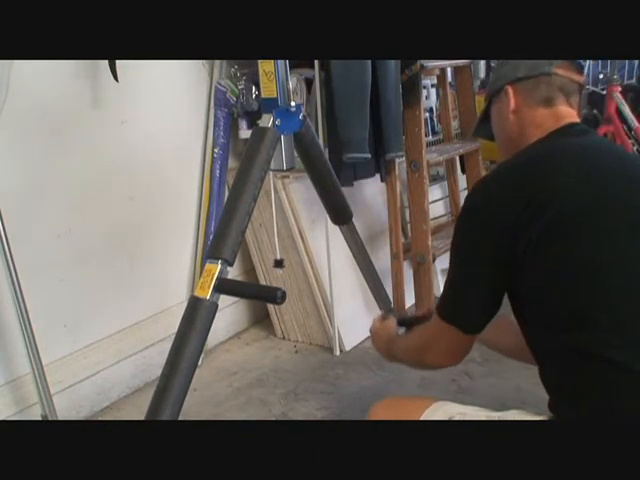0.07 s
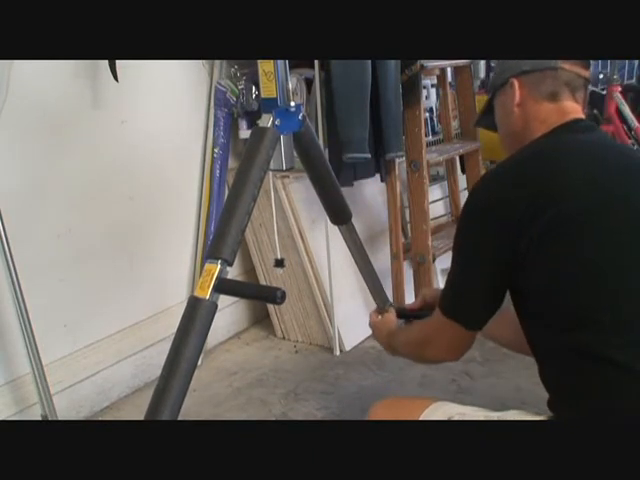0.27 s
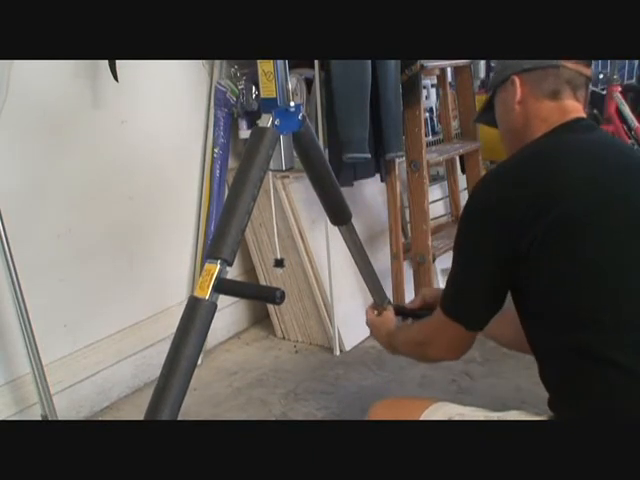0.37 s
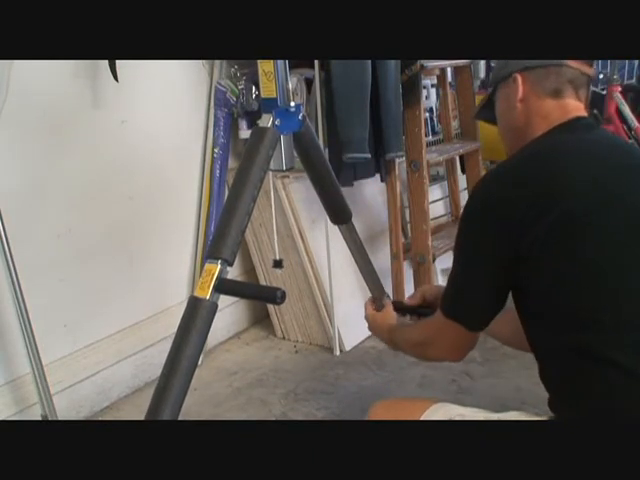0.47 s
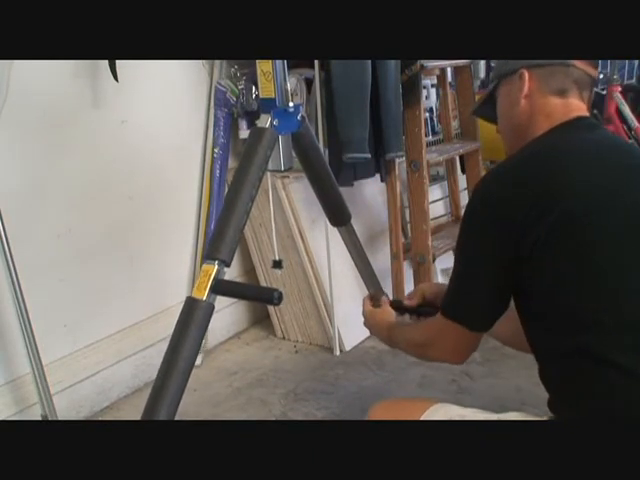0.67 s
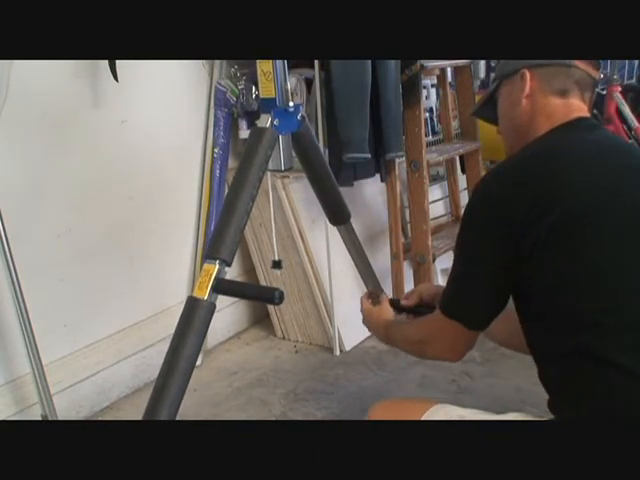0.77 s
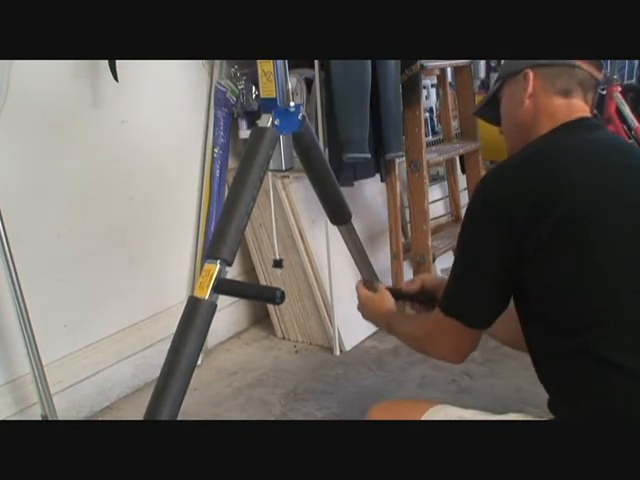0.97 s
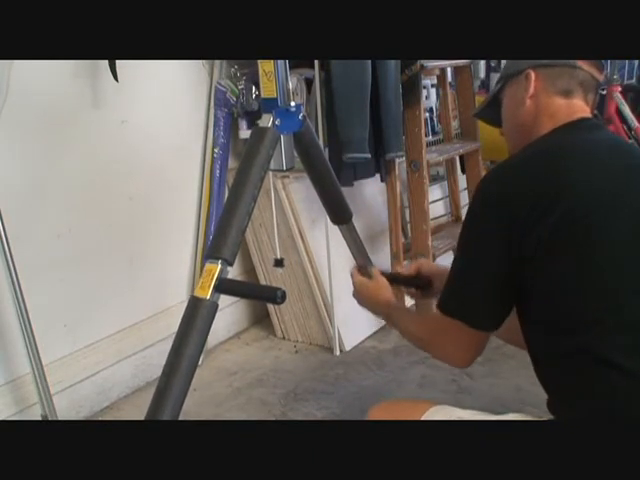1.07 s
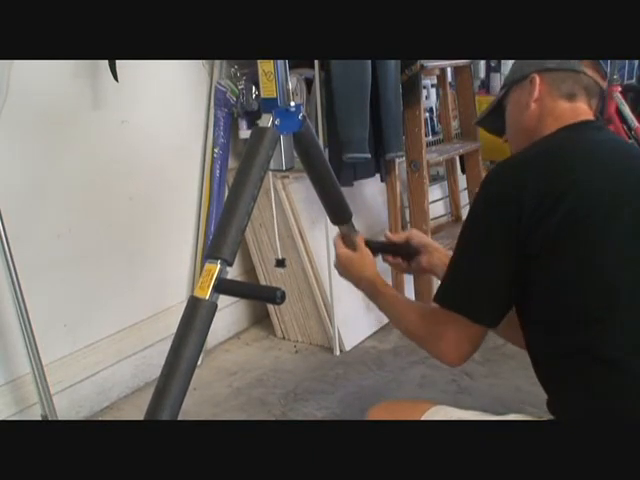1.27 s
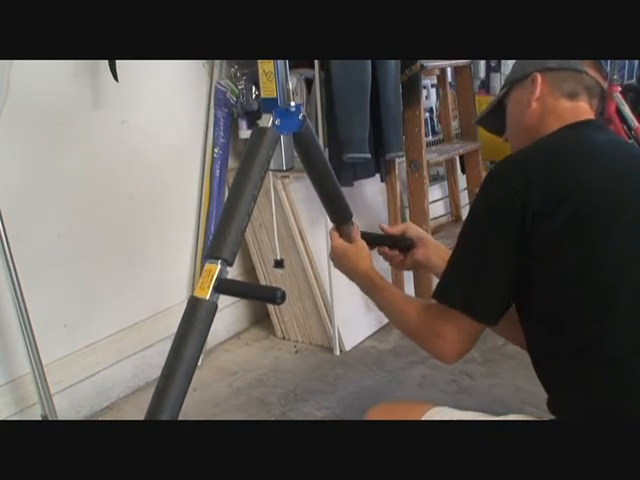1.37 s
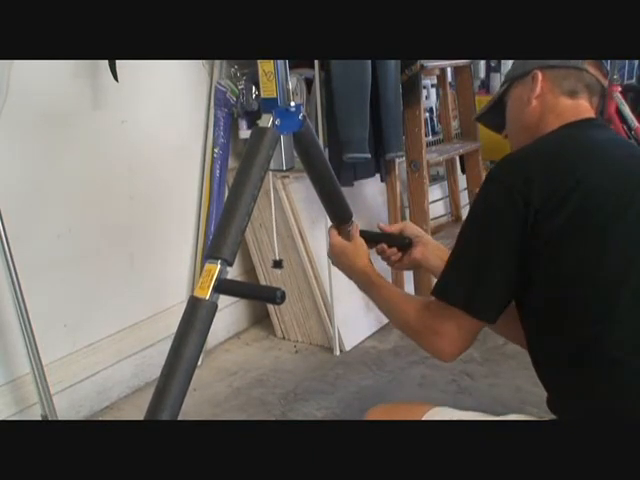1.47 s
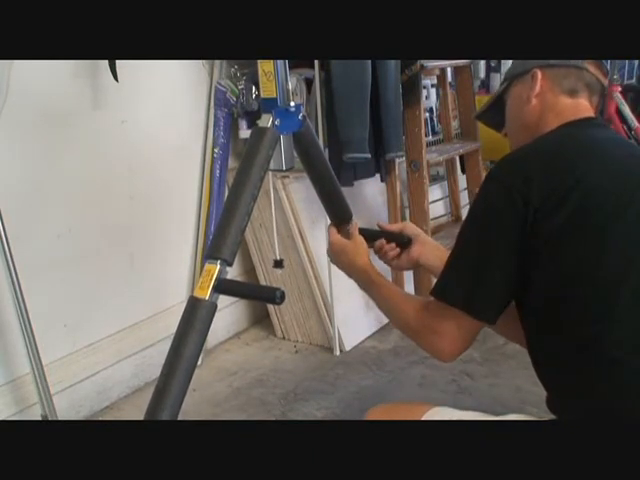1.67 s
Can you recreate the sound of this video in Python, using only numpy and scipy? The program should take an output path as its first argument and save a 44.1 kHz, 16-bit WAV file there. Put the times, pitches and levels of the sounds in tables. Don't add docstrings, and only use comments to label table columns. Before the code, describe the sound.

A padded peg's steel collar knocks a hollow tube end, then the leg, stutters dully as it is pushed on, and scrapes upward with ringing catches; close microphone in a bare, lively garage.

```python
import sys
import numpy as np
from scipy import signal
from scipy.fft import rfft, irfft, next_fast_len
from scipy.io import wavfile
from scipy.ndimage import uniform_filter1d, map_coordinates

SR = 44100
rng = np.random.default_rng(int(sys.argv[2]) if len(sys.argv) > 2 else 0)


def linear_from_db(decibels):
    return 10 ** (np.asarray(decibels, float) / 20)


def log_audio(samples):
    frames = np.atleast_2d(samples).T
    limited = np.clip(frames, -1, 1)
    pcm = np.round(limited * 32767).astype(np.int16)
    wavfile.write(sys.argv[1], SR, pcm)


N = 74970

# frequency in Hz, level in dB.
AIR_COLOUR = [(15, -63), (25, -32), (45, -14), (74, -10.5), (108, -12.5), (166, -9), (223, -23.5),
              (700, -27), (2910, -33.5), (9820, -46), (16000, -40)]
# frequency in Hz, rms level in dB.
MOTOR_LINES = [(57, -65), (86, -63.5)]
# frequency in Hz, level in dB.
TREMBLE_COLOUR = [(15, -52), (25, -26), (40, -15), (70, -5), (114, -22), (200, -7.5), (260, -3),
                  (440, -120)]
# time in seconds, trembling level in dB.
GRIP = [(.2, -77), (.24, -49.5), (.45, -60.5), (.56, -44.5), (.68, -43.5), (.76, -65.5), (1.1, -51),
        (1.7, -59.5)]
# frequency in Hz, time to fall 60 dB in seconds.
ROOM_DECAY = [(100, 0.96), (400, 0.71), (1500, 0.45), (5000, 0.55), (12000, 0.41)]
# start in seconds, frequency in Hz, level in dB,
# time to fall 60 dB in seconds.
LEG_TONES = [(.215, 363, -34.5, 0.42), (.215, 550, -36, 0.35), (.505, 435.9, -27.5, 0.49),
             (.52, 292, -37.5, 0.71), (.55, 190, -39.5, 0.53), (.505, 580, -40.5, 0.79),
             (.8, 203.6, -41, 0.84), (.8, 268.4, -42.5, 0.71), (.8, 560, -34.5, 0.23),
             (1.09, 382.6, -40.5, 0.77), (1.2, 332, -35.5, 0.23), (1.2, 211, -36.5, 0.22),
             (1.43, 334, -37.5, 0.44), (1.102, 970, -30.5, 0.092), (1.36, 3950, -43, 0.18),
             (1.412, 3960, -40, 0.1), (1.6, 2884, -61.5, 1.8), (.642, 3230, -40.5, 0.33),
             (.232, 4870, -32, 0.42), (1.08, 540, -37.5, 0.35)]

# time in seconds, rubbing level in dB, brightness in dB.
STROKE = [(0.299, -42, -36), (0.381, -37.5, 3), (.46, -35.5, 3), (.62, -39, 4.5), (.75, -53.5, 4),
          (0.802, -40, 12), (.86, -61, -3), (0.923, -60, -24), (0.959, -35, 4.5), (1.06, -34.5, 0),
          (1.107, -33, 5.5), (1.19, -38, 9), (1.27, -32, 3.5), (1.36, -35, 4), (1.45, -33, -2),
          (1.559, -48.5, -9), (1.629, -58, -2.5)]
# start in seconds, end in seconds.
CLIMB = [
    (.78, 0.816),
    (1.05, 1.143),
    (1.38, 1.425),
]
# frequency in Hz, level in dB.
RUB_COLOUR = [(60, -72), (110, -17.5), (370, 0), (680, -7), (1100, -0.5), (2200, -9), (2850, -16),
              (4400, -13.5), (6000, -14.5), (16000, -24)]
# frequency in Hz, width in Hz, level in dB.
TIP_RING = [(1010, 110, 3), (1430, 33, -5), (1810, 175, 4), (3295, 88, 0.5), (3880, 160, -9),
            (5070, 60, -3.5), (5800, 100, -11), (7300, 35, -17), (7550, 71, -15)]
LOW_RING = [(1946, 27, 1.5), (2280, 37, -18), (3370, 84, -9), (3920, 44, -5), (4870, 97, -3.5),
            (5320, 38, -2), (5700, 29, -11), (5870, 35, -4), (6700, 45, -6), (7270, 80, -23)]
HIGH_RING = [(836, 18, 2.5), (1113, 120, 4), (1230, 41, -9), (1710, 150, -4.5), (3173, 33, -5),
             (3410, 41, -3), (3983, 35, -6), (5050, 160, -8), (5630, 50, -8), (6130, 120, -11),
             (7100, 40, -16), (7600, 50, -13), (2210, 61, -20)]
TOP_RING = [(326, 260, -8.5), (1070, 160, -4), (1740, 105, -6.5), (2240, 49, -4.5), (2800, 140, -10),
            (3200, 37, -1.5), (3480, 35, -2), (3970, 130, -10), (4950, 120, -5.5), (5560, 110, -9),
            (6210, 36, -7), (7440, 43, -23)]

# start in seconds, peak in dB, contact in seconds.
NUDGES = [
    (1.262, -29, 0.0068),
    (1.366, -27, 0.0063),
    (1.437, -30, 0.0043),
]
# start in seconds, peak in dB, contact in seconds,
# sizzle in dB.
SHOVES = [
    (0.779, -27.5, 0.0029, -20),
    (0.789, -27.5, 0.003, -10),
    (0.801, -25.5, 0.0011, 3),
    (0.806, -21.5, 0.0037, 7),
    (0.811, -24, 0.0026, 9.5),
]
# start in seconds, peak in dB, contact in seconds.
SEATS = [
    (.2125, -13, 0.0045),
    (.219, -18, 0.0098),
    (0.4999, -15.5, 0.0046),
    (.507, -16, 0.0034),
    (.515, -19, 0.0034),
]
# start in seconds, peak in dB, contact in seconds, tone in Hz, sizzle in dB.
CATCHES = [(.639, -23, 0.0069, 3230, -24), (.936, -22.5, 0.0032, 1900, 9.5),
           (0.939, -16.5, 0.0022, 3260, 13), (1.014, -22, 0.0063, 2330, -22),
           (1.017, -16.5, 0.006, 3390, 0.5), (1.078, -18.5, 0.0033, 2730, -8),
           (1.085, -26.5, 0.0077, 3480, 0), (1.179, -23.5, 0.0031, 1560, -22),
           (1.207, -17.5, 0.0052, 1900, -14), (1.21, -26.5, 0.0044, 3500, -5)]
# frequency in Hz, level in dB.
END_COLOUR = [(88, -41), (250, -15.5), (400, -4), (700, -20), (1080, -9), (2300, -17), (3400, -12),
              (3900, -26), (5000, -17), (8800, -40), (16000, -30)]
LEG_COLOUR = [(88, -44), (200, -11.5), (430, -5.5), (700, -10), (1300, -5.5), (2600, -18), (4580, -22),
              (5800, -17), (16000, -33.5)]
SHOVE_COLOUR = [(88, -41), (150, -16), (197, -1), (730, -0.5), (1830, -11), (3480, -9.5), (3770, -27),
                (5250, -17), (16000, -28.5)]
CATCH_COLOUR = [(88, -53.5), (150, -19.5), (2310, -1), (2810, -4.5), (3350, -6), (3690, -6.5), (12400, -23),
                (15100, -54), (16000, -76)]
# frequency in Hz, width in Hz, level in dB.
END_RING = [(998, 135, 2.5), (1900, 75, 3.5), (2260, 65, 3.5), (3340, 59, -10), (3400, 22, -7),
            (4857, 25, 0.5), (5230, 230, -9.5), (5560, 25, -6), (5930, 51, -19), (7590, 200, -13),
            (9660, 170, -21), (12200, 500, -22)]
LEG_RING = [(840, 29, -1.5), (1145, 44, 0), (1290, 23, -2), (1415, 41, 3), (1930, 19, -2), (2220, 33, -4.5),
            (5400, 26, -6), (6190, 40, -7), (5730, 220, -9.5), (7460, 18, -9)]
SHOVE_RING = [(1150, 140, 3.5), (1860, 150, 5.5), (3370, 29, 5), (4240, 39, 1), (5440, 100, -1.5),
              (7600, 33, -7), (8740, 96, -12)]
CATCH_RING = [(2330, 17, 3.5), (3290, 42, 5), (5180, 19, 3.5), (6070, 87, 1), (7060, 310, -10.5),
              (7940, 170, -10), (8700, 40, -6.5)]

# frequency in Hz, side over mid in dB.
WIDTH = [(60, -18), (300, -15.5), (1000, -9.5), (5000, -8.5), (9000, -6), (10800, -0.5), (11500, -20)]
# frequency in Hz, left over right in dB.
LEAN = [(60, -3), (300, -2), (700, -2.5), (1500, 0.5), (10000, -0.5), (12000, 0)]

SEAT_RING_DB, SHOVE_RING_DB, CATCH_RING_DB, RUB_RING_DB = -1.5, 2.0, 1.5, 2
SEAT_WET_DB, SHOVE_WET_DB, CATCH_WET_DB, RUB_WET_DB = 0, 1.5, -3.5, 2
ROOM_GAP_S = .004
RISE_S, SIZZLE_RISE_S, SIZZLE_HZ = 0.00069, .004, 4500
DAMPED = 2.2
TONE_DB, TONE_Q = 15, 22


def unit(x):
    return x / np.sqrt(np.mean(x ** 2) + 1e-20)


def along(points, hz):
    f, v = np.transpose(points)
    return np.interp(np.log(hz + 1), np.log(f + 1), v)


def filtered(x, response):
    m = 2 * next_fast_len(x.shape[-1] // 2 + SR // 4)
    spectrum = rfft(x, m) * response(np.fft.rfftfreq(m, 1 / SR))
    return irfft(spectrum, m)[..., :x.shape[-1]]


def causal(db):
    cepstrum = irfft(np.log(np.maximum(linear_from_db(db), 1e-6)))
    cepstrum[1:len(db) - 1] *= 2
    cepstrum[len(db):] = 0
    return np.exp(rfft(cepstrum))


def steel(force, colour, modes, ring_db):
    def response(f):
        peaks = 0
        for hz, width, db in modes:
            power = linear_from_db(2 * (ring_db + db - along(colour, hz)))
            peaks = peaks + power * (f * width) ** 2 / ((hz * hz - f * f) ** 2 + (f * width) ** 2)
        gain_db = along(colour, f) + 10 * np.log10(1 + peaks)
        return causal(gain_db) / np.sqrt(np.mean(linear_from_db(2 * gain_db)))
    return filtered(force, response)


def garage(x):
    hz, t, z = signal.stft(rng.standard_normal((2, SR * 3 // 5)), SR, nperseg=256)
    decay = linear_from_db(-60 * t / along(ROOM_DECAY, hz)[:, None])
    tail = signal.istft(z * decay, SR, nperseg=256)[1]
    tail = tail / np.linalg.norm(tail[0])
    tail = np.pad(tail, ((0, 0), (int(ROOM_GAP_S * SR), 0)))
    return signal.fftconvolve(x[None], tail, axes=1)[:, :len(x)]


def garage_air():
    air = filtered(rng.standard_normal((2, N)), lambda f: linear_from_db(along(AIR_COLOUR, f)))
    return linear_from_db(-58) * unit(air)


def motor():
    t = np.arange(N) / SR
    return sum(linear_from_db(db + 3.5) * np.sin(2 * np.pi * hz * t) for hz, db in MOTOR_LINES)


def trembling():
    s, db = np.transpose(GRIP)
    level = linear_from_db(np.interp(np.arange(N) / SR, s, db, left=-120))
    shake = filtered(rng.standard_normal((2, N)), lambda f: linear_from_db(along(TREMBLE_COLOUR, f)))
    return level * unit(shake)


def legs():
    out = np.zeros((2, N))
    for s, hz, db, t60 in LEG_TONES:
        t = np.maximum(np.arange(N) / SR - s, 0)
        wander = [map_coordinates(k, [t * 25]) for k in rng.standard_normal((2, 60))]
        drift = 0.79 * np.array(wander)
        swell = 1 - np.exp(-t / 0.0067)
        out += linear_from_db(db - 60 * t / t60) * swell * np.sin(2 * np.pi * hz * t + drift)
    return out


def scrape():
    s, db, bright_db = np.transpose(STROKE)
    t = np.arange(N) / SR
    clumps = linear_from_db(2.2 * map_coordinates(rng.standard_normal(100), [t * 45]))
    grains = rng.random(N) < 4000 / SR
    grain_db = np.minimum(4.3 * rng.exponential(size=N), 11)
    grit = grains * linear_from_db(grain_db) * rng.choice([-1, 1], N)
    hiss = 0.88 * rng.standard_normal(N)
    force = clumps * (unit(grit) + hiss)

    on, up, top = (np.interp(t, span, [0, 1]) for span in CLIMB)
    places = [(1 - on, TIP_RING), (on * (1 - up), LOW_RING), (up * (1 - top), HIGH_RING), (top, TOP_RING)]
    x = unit(sum(steel(np.sqrt(share) * force, RUB_COLOUR, ring, RUB_RING_DB) for share, ring in places))

    high = filtered(x, lambda f: 1 / (1 + (2000 / (f + 1)) ** 4))
    x = x - high + high * linear_from_db(np.interp(t, s, bright_db))
    x = x * linear_from_db(np.interp(t, s, db, left=-120) - 5.0)

    fades = [np.clip(1 - abs(t / .3 - k), 0, 1) for k in range(7)]
    room = sum(garage(x * fade) for fade in fades)
    return x * [[1], [.5]] + linear_from_db(RUB_WET_DB) * room


def blow(s, db, contact_s, colour, modes, ring_db, wet_db, tone_hz=None, sizzle_db=0):
    t = np.arange(SR * 3 // 5) / SR
    rise_s = np.array([[RISE_S], [SIZZLE_RISE_S]])
    envelope = (1 - np.exp(-t / rise_s)) * np.exp(-t / (contact_s + rise_s))
    body_and_sizzle = rng.standard_normal(len(t)) * envelope

    def upper(f):
        return 1j * f / SIZZLE_HZ / (1 + 1j * f / SIZZLE_HZ)

    force = filtered(body_and_sizzle, lambda f: np.array([1 - upper(f), upper(f) ** 2])).sum(axis=0)

    lumps = abs(rfft(force, 4096)) ** 2
    lumps_db = 10 * np.log10(uniform_filter1d(lumps, size=9) / lumps.mean())
    lumps_hz = np.linspace(0, SR / 2, len(lumps))

    def evened(f):
        return causal(sizzle_db * abs(upper(f)) ** 4 - np.interp(f, lumps_hz, lumps_db))

    force = filtered(force, evened)
    modes = [(hz, DAMPED * width, level) for hz, width, level in modes]
    if tone_hz:
        modes += [(tone_hz, tone_hz / TONE_Q, TONE_DB + along(colour, tone_hz) - ring_db)]
    x = linear_from_db(db) * steel(force, colour, modes, ring_db)
    out, at = np.zeros((2, N + len(t))), round(s * SR)
    out[:, at:at + len(t)] = x * [[1], [.3]] + linear_from_db(wet_db) * garage(x)
    return out[:, :N]


def nudges():
    return sum(blow(*row, RUB_COLOUR, HIGH_RING[:3], RUB_RING_DB, CATCH_WET_DB, sizzle_db=6) for row in NUDGES)


def shoves():
    return sum(blow(*row, SHOVE_COLOUR, SHOVE_RING, SHOVE_RING_DB, SHOVE_WET_DB, sizzle_db=sizzle_db)
               for *row, sizzle_db in SHOVES)


def catches():
    return sum(blow(*row, CATCH_COLOUR, CATCH_RING, CATCH_RING_DB, CATCH_WET_DB, tone_hz, sizzle_db)
               for *row, tone_hz, sizzle_db in CATCHES)


def seats():
    end = sum(blow(*row, END_COLOUR, END_RING, SEAT_RING_DB, SEAT_WET_DB) for row in SEATS[:2])
    leg = sum(blow(*row, LEG_COLOUR, LEG_RING, SEAT_RING_DB, SEAT_WET_DB) for row in SEATS[2:])
    return end + leg


def scene():
    knocks = seats() + shoves() + catches() + nudges()
    mid, side = knocks + legs() + scrape() + garage_air() + trembling() + motor()
    side = filtered(side, lambda f: causal(along(WIDTH, f)))

    def lean(f):
        half_db = along(LEAN, f) / 2
        return np.array([causal(half_db), causal(-half_db)])

    return filtered(np.array([mid + side, mid - side]), lean)


def roll_off(x):
    return signal.sosfilt(signal.butter(12, 15880, fs=SR, output="sos"), x)


def record(dry):
    mix = filtered(dry, lambda f: f < 15880)
    return roll_off(mix)


dry = scene()
out = record(dry)
log_audio(out)
```